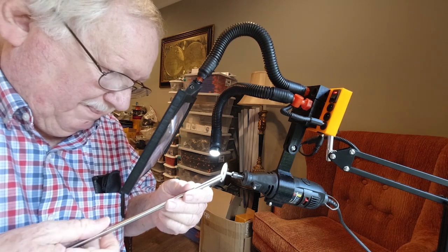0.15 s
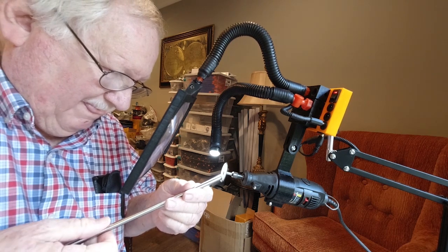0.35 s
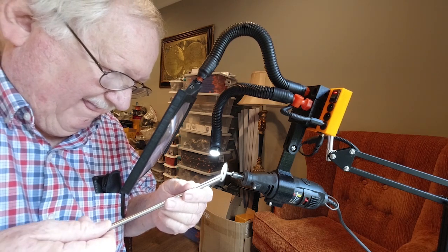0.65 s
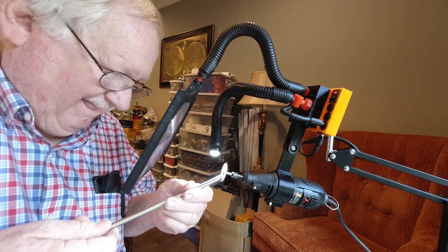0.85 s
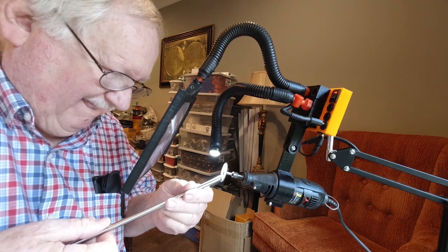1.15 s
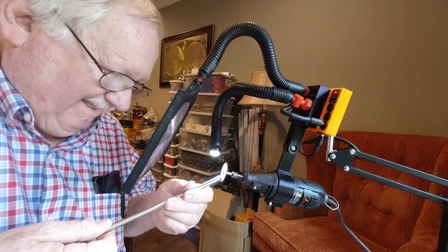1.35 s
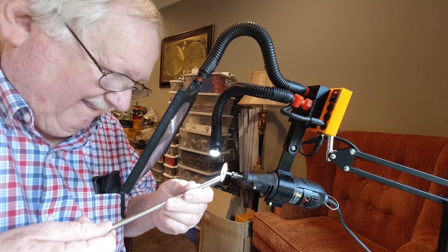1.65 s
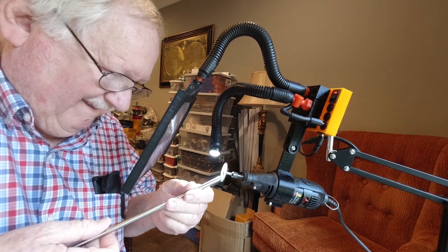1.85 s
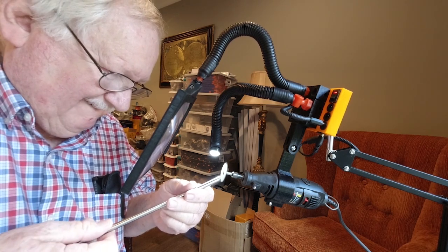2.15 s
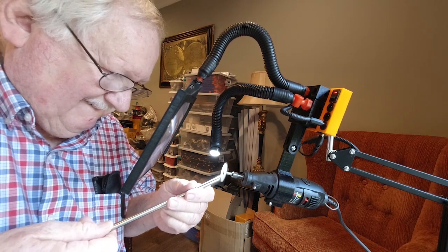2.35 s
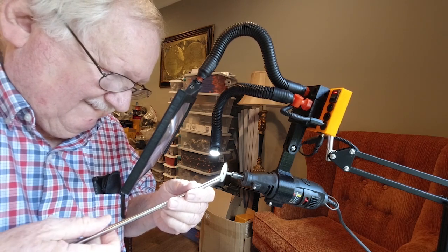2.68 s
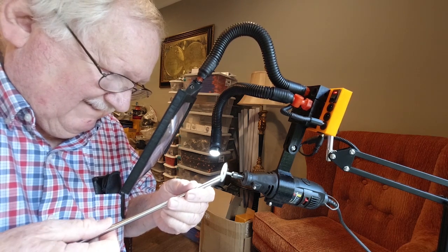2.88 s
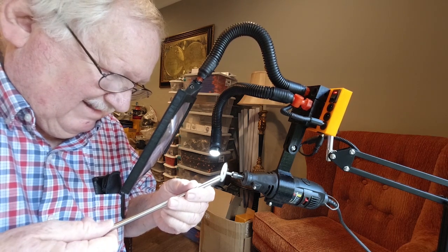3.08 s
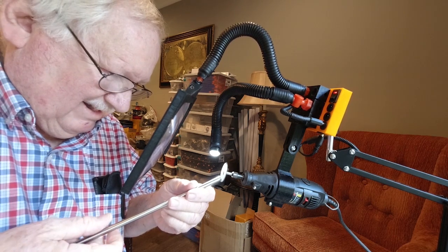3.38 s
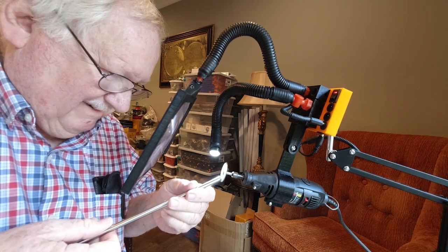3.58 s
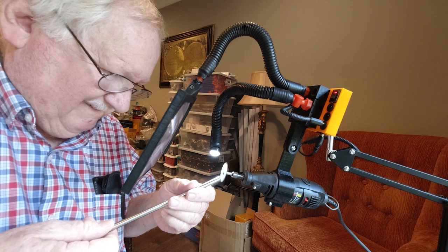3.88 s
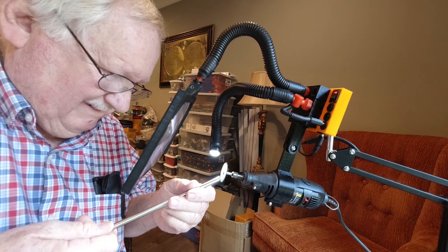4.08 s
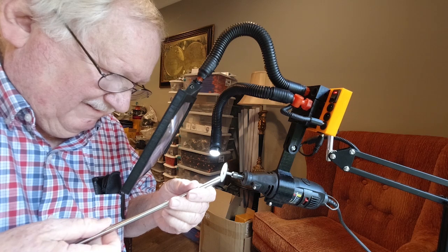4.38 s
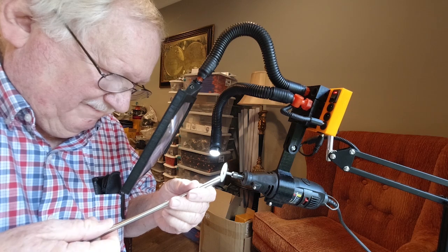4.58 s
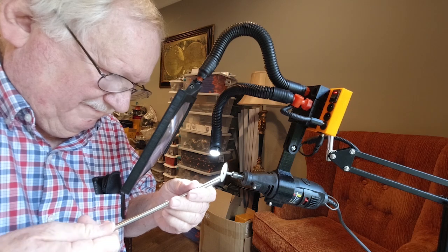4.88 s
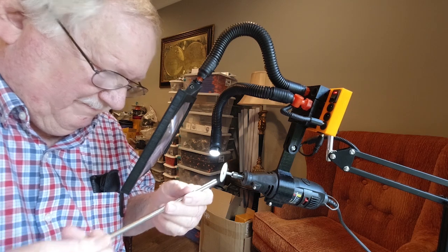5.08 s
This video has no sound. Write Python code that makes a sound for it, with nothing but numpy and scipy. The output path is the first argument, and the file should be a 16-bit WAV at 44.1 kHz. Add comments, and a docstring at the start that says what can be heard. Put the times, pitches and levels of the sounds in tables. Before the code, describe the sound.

High, raspy grinding is there from the start as a rotary tool's spinning wheel cuts a thin metal rod. Shrill squeals and ringing tones come and go over a fizzing hiss and a faint motor whine. The contact breaks briefly about two seconds in, resumes in uneven surges, then thins to light touches. The sound is close, in wide stereo, with the short echoes of a small room.

```python
"""A rotary tool's cut-off wheel, near 155 turns a second, grinds a thin metal rod pushed in by hand.
The same rim grit strikes the rod on every turn and slowly wears; this nearly periodic force drives the
modes of rod and wheel, which scrape, ring, screech and whistle. The motor sags under the load.
Between cuts only the mains-fed motor hums and whines, with the hiss of its cooling air.
A small furnished room adds short echoes, and the stereo image is widened."""
import sys
import numpy as np
from scipy import signal
from scipy.fft import rfft, irfft
from scipy.io import wavfile
from scipy.ndimage import uniform_filter1d, map_coordinates

SR = 44100
rng = np.random.default_rng(int(sys.argv[2]) if len(sys.argv) > 2 else 0)


def master(y):
    """Save y as 16-bit WAV."""
    cut = np.clip(np.atleast_2d(y).T, -1, 1)
    pcm = np.round(cut * 32767)  # scale
    wavfile.write(sys.argv[1], SR, pcm.astype(np.int16))


N = 230510
T = np.arange(N) / SR
FREQS = np.fft.rfftfreq(N, 1 / SR)
IDLE_HZ, MAINS_PULSE_HZ, TOP_HZ = 156.8, 120, 15750


def undb(db):
    """Decibels to amplitude ratio."""
    return 10 ** (np.asarray(db) / 20)


def unit(x):
    """Normalisation to rms 1."""
    return x / np.sqrt(np.mean(x ** 2))


def steady(x, seconds=0.11):
    """Normalisation of the short-term rms to 1, keeping the grain."""
    return x / np.sqrt(np.abs(uniform_filter1d(x ** 2, int(seconds * SR))) + 1e-12)


def walk(rate_hz):
    """Low-pass noise: a smooth random drift of rms 1."""
    hold = int(SR / rate_hz)
    steps = np.repeat(rng.standard_normal(N // hold + 1), hold)
    return unit(uniform_filter1d(uniform_filter1d(steps, hold), hold)[:N])


def swell(middle_s, length_s):
    """A rounded envelope that rises from 0 to 1, holds and falls."""
    return 1 / (1 + (2 * (T - middle_s) / length_s) ** 4)


def swells(events):
    """Superposed swells: one curve for each column after middle_s and length_s."""
    return np.transpose(events)[2:] @ np.array([swell(row[0], row[1]) for row in events])


def colour(x, points):
    """Zero-phase filtering by a curve of (frequency_hz, gain_db) points."""
    hz, db = np.transpose(points)
    return irfft(rfft(x) * undb(np.interp(np.log(FREQS + 1), np.log(hz), db)), N)


def resonate(spectrum, hz, width_hz):
    """Forced response of one damped mode, with steepened skirts."""
    f = FREQS + 1
    response = spectrum / (1 + 1j * (f * f - hz * hz) / (f * width_hz))
    return irfft(response / (1 + ((f - hz) / (5 * width_hz)) ** 2), N)


def ring(force, modes, shift_db):
    """Modal superposition: as the contact point creeps, each mode takes a changing share."""
    # a small part radiates little below its lowest mode
    spectrum = rfft(force) / np.sqrt(1 + (0.36 * modes[0][0] / (FREQS + 1)) ** 8)
    return steady(sum(undb(db + shift_db * walk(8)) * resonate(spectrum, hz, width_hz)
                      for hz, width_hz, db in modes))


def level(load, base_db, per_force, per_rasp, flutter_db):
    """Power-law gain in the hand's force and rasp, fluttering as the contact point shifts."""
    force_db, rasp_db = load
    return undb(base_db + per_force * force_db + per_rasp * rasp_db + flutter_db * walk(20.58))


def hand(release_db_per_s=343, tremor_hz=15, tremor_db=0.6, settled_chips_db=-11):
    """Contact loading: each press rises linearly, holds and decays exponentially."""
    # rod against wheel: touch_s, lift_s, attack_s, force_db, rasp_db, rod_db, screech_db, fizz_db
    contacts = [(0, 0.287, 0.001, -4, 6.5, -2, -3.5, -13), (0.343, 0.708, 0.18, -3, 4, 2, -1, -9),
                (0.725, 1.105, 0.068, -1.5, 3, 1, 2.5, -5), (1.096, 2.058, 0.1, -2, 0, 1, -0.5, 2),
                (2.188, 2.481, 0.018, -1.5, 0, 2, 1.5, 7),
                (2.522, 3.701, 0.024, -0.77, -0.3, -4.5, -2.5, 2),
                (3.703, 3.999, 0.21, 5, -0.2, -5.5, -2, 1), (4.211, 4.84, 0.028, -0.5, -1.9, -1.5, -1.5, 5),
                (4.903, 4.947, 0.04, -3, -4, -8, -3.5, 3), (5.021, 5.033, 0.014, -9, -6, -2, 3, 4),
                (5.052, 5.046, 0.0071, -11, -5, -7, -12, 5)]
    # the grinding briefly surges or dips:
    # middle_s, length_s, force_db, rasp_db, chips_db, shrill_db, fizz_db
    swings = [(0.162, 0.22, 2.5, 0, 29.5, 4, -5), (0.405, 0.044, 3, -1.5, 10, -18, -12),
              (0.53, 0.2, 1.5, 4, 10, 6.5, -6), (0.64, 0.073, -0.5, 0.5, 3.5, 5, -1),
              (0.74, 0.039, -3, 2, 14, -5, 0), (0.93, 0.16, -1, 2, 1, 4, -2),
              (1.016, 0.21, 4, 0.5, 15.5, 2, 10), (1.295, 0.08, 1, 5, 5, 6, -3),
              (1.37, 0.079, 1.5, 5, 9.5, -2, 0), (1.465, 0.09, 7, 2, 8.5, -8, -6),
              (1.565, 0.098, 3.5, 1.5, 10, 10, 1), (1.68, 0.04, 1.5, -1, 5, -5, 0),
              (1.78, 0.2, 3.5, 1.5, 5.5, 3, -4), (1.915, 0.14, 2.5, 2.5, 7.5, 6.5, -5),
              (2.055, 0.05, -2.5, 3, 11.5, 9, 2), (2.26, 0.062, -1.5, 0, 4, 0, 0),
              (2.33, 0.11, 2, 0, 7, 3, -1), (2.44, 0.1, 1, 0, 16, 4, -6), (2.62, 0.12, 4.5, 3, 10, 8, -1),
              (2.725, 0.12, 4, 2.5, 8.5, 1, 3), (3.04, 0.17, 5, -0.5, 11, -5, -9),
              (3.16, 0.08, 6, -0.5, 5.5, -16, -11), (3.475, 0.25, 7, 2, 10, 4, -3),
              (3.555, 0.031, -8, -2, 9, 7, 4), (3.68, 0.081, 2, -1, 11, -2, -1),
              (3.812, 0.012, -12, 3, 13, -5, 0), (3.955, 0.055, -4, -0.5, 13.5, 0, 0),
              (4.238, 0.028, 3, -2.5, 9.5, 3, -10), (4.35, 0.19, 6, 0.5, 15.5, -7, 2),
              (4.61, 0.28, 1.5, -0.5, 6, 0, -2), (4.735, 0.044, 0.5, 2, 7, -8, -3),
              (4.79, 0.055, -1, 1.5, 11, -13, -8)]
    presses = np.array([np.clip((T - touch) / attack, 0, 1)
                        * undb(db - release_db_per_s * np.maximum(T - lift, 0))
                        for touch, lift, attack, db, *_ in contacts]) + 1e-9
    total = presses.sum(axis=0)
    rasp_db, rod_db, screech_db, fizz_db = np.transpose(contacts)[4:] @ presses / total
    swing_db, swing_rasp_db, chips_db, shrill_db, swing_fizz_db = swells(swings)
    force_db = 20 * np.log10(total) + swing_db + tremor_db * walk(tremor_hz)
    return (force_db, rasp_db + swing_rasp_db, settled_chips_db + chips_db,
            rod_db, screech_db, shrill_db, fizz_db + swing_fizz_db)


def rim(turns, wear_turns, size=280, evenness=0.51):
    """Quasi-periodic excitation: a random rim profile returns each turn and is renewed by wear."""
    kept = np.exp(-1 / wear_turns)
    fresh = rng.standard_normal((N // 200, size))
    initial = kept * rng.standard_normal((1, size))
    worn, _ = signal.lfilter([np.sqrt(1 - kept ** 2)], [1, -kept], fresh, axis=0, zi=initial)
    harmonics = rfft(worn)
    evened = irfft(harmonics / (abs(harmonics) ** 2 + size / 10) ** (evenness / 2), size)
    return unit(map_coordinates(evened.ravel(), [turns * size], order=3, mode="nearest"))


def grit(turns, chips_db, pinch_db, chatter_per_db=0.28, lobes_db=1.5, wobble_db=1.5):
    """Abrasion: repeating grains and random chips give a force, modulated by the wheel's high spots."""
    # the warped wheel rubs each wall of the groove once a turn, and chatters when pinched
    wobble = (walk(5.14) + chatter_per_db * pinch_db) * np.cos(4 * np.pi * turns)
    ripple = undb(lobes_db * rim(turns, wear_turns=73, size=30) + wobble_db * wobble)
    grains = rim(turns, wear_turns=45)
    chips = undb(chips_db) * rng.standard_normal(N)
    force = steady(ripple * (grains + chips))
    # the light chips shake the rod less
    rod_force = steady(ripple * (rim(turns, wear_turns=25.8, evenness=1) + 0.5 * chips))
    return force, rod_force, ripple


def scraping(force, load, stall_db, shift_db=5.0, bands=18):
    """Modal overlap: dense modes of rod and wheel swell in groups as the groove changes shape."""
    # scrape spectrum: frequency_hz, gain_db
    response = [(60, -77), (400, -17.5), (700, -25), (1400, -23), (2400, -5.5), (2750, -16), (3000, -8.5),
                (3300, -10), (4100, -7.5), (4800, -8), (5300, -6.5), (6300, -8), (7200, -12), (8200, 0.5),
                (9200, 4), (13000, -13), (15600, -3)]
    spectrum, step_hz = rfft(colour(force, response)), TOP_HZ / bands
    groups = (irfft(spectrum * np.maximum(1 - abs(FREQS / step_hz - k), 0), N) for k in range(bands + 2))
    scrape = steady(sum(group * undb(shift_db * walk(7.4)) for group in groups))
    return scrape * level(load, -36.5 + stall_db, per_force=0.97, per_rasp=1, flutter_db=1.5)


def fizzing(force, load, fizz_db):
    """High-band noise: fine dust fizzes at the top of the contact force's spectrum."""
    # dust spectrum: frequency_hz, gain_db
    response = [(1000, -74), (9000, -28), (13000, 0), (13500, 4), (14200, 0), (15400, -2.5)]
    fizz = steady(colour(force, response))
    return fizz * level(load, -42 + fizz_db, per_force=0.59, per_rasp=0.078, flutter_db=2.2)


def rod_bending(force, load, rod_db):
    """Flexural vibration: the rod's bending modes ring out when the grip eases."""
    # bending modes: pitch_hz, width_hz, level_db
    modes = [(1290, 130, -15.5), (1535, 100, -7.5), (1874, 47, 3), (1963, 21, 12), (2400, 210, -1),
             (2514, 200, 1.5)]
    # the grip eases: middle_s, length_s, lift_db
    easings = [(.15, 0.023, 4), (.28, 0.076, 7), (.44, 0.33, 7), (.53, 0.06, -0.5), (.65, 0.1, 5.5),
               (.9, 0.1, 9), (.99, 0.036, 7.5), (1.11, 0.066, 7), (1.38, 0.12, 4.5), (1.605, 0.034, 3),
               (1.8, 0.07, 3), (2.06, 0.036, 4), (2.22, 0.03, -4), (2.38, 0.045, -1), (2.635, 0.1, 9.5),
               (2.74, 0.028, 8), (2.87, 0.038, 8.5), (3.07, 0.025, 12), (3.15, 0.046, 1), (3.4, 0.14, 8),
               (3.79, 0.1, 8.5), (3.99, 0.04, 6.5), (4.25, 0.056, 5), (4.4, 0.077, 6.5), (4.6, 0.082, 0.5),
               (4.76, 0.11, 0)]
    lift_db, = swells(easings)
    bending = ring(force, modes, shift_db=3.5)
    return bending * level(load, -45 + rod_db + lift_db, per_force=0.052, per_rasp=0.054, flutter_db=1.34)


def rod_screeching(force, load, screech_db, shift_db=2.5, reach_hz=415):
    """Resonance of the rod's upper modes: each screech lifts those near its own pitch."""
    # upper modes: pitch_hz, width_hz, level_db
    modes = [(3290, 210, -4.5), (3689, 165, -1.5), (4090, 99, -10.5), (4455, 97, -19), (4710, 76, -7),
             (4990, 260, -16), (6530, 1060, -6)]
    # the rod screeches in the groove: middle_s, length_s, lift_db, pitch_hz
    screeches = [(0.035, 0.15, 19.5, 4880), (0.19, 0.13, 23, 5040), (0.227, 0.18, 14, 6350),
                 (0.521, 0.054, 16.5, 4700), (0.586, 0.26, 10.5, 6500), (0.687, 0.068, 7, 4760),
                 (0.912, 0.13, 11.5, 4920), (0.977, 0.31, 4, 6400), (1.086, 0.052, 15, 5200),
                 (1.286, 0.06, 16, 4140), (1.354, 0.069, 10.5, 4570), (1.432, 0.22, -11, 4000),
                 (1.467, 0.04, 14, 5130), (1.568, 0.11, 16, 4270), (1.817, 0.16, 9, 4040),
                 (1.9, 0.2, -4, 6300), (1.93, 0.074, 9, 4200), (2.632, 0.13, 19, 4420),
                 (2.834, 0.17, 0.5, 3450), (3.086, 0.074, 16, 4500), (3.215, 0.1, 17, 4230),
                 (3.486, 0.17, 22, 4500), (4.35, 0.3, 12, 4230), (4.358, 0.19, 8, 6400),
                 (4.556, 0.29, 1, 4680), (4.656, 0.35, 4.5, 6260)]
    spectrum, out = rfft(force), 0
    lifts_db = np.array([db * swell(middle, length) for middle, length, db, _ in screeches])
    pitches_hz = np.transpose(screeches)[3]
    for hz, width_hz, db in modes:
        lift_db = np.exp(-((pitches_hz - hz) / reach_hz) ** 2) @ lifts_db
        out += undb(db + lift_db + shift_db * walk(10)) * steady(resonate(spectrum, hz, width_hz))
    return out * level(load, -44.5 + screech_db, per_force=0.29, per_rasp=0.14, flutter_db=2.33)


def wheel_ringing(force, load, low_db, squeal_db, shrill_db):
    """Forced vibration of a disc: the grit drives four groups of the wheel's modes."""
    # wheel modes, lowest group first: pitch_hz, width_hz, level_db
    low_modes = [(7110, 47, -4.5), (7530, 123, 2.5)]
    squeal_modes = [(10486, 150, -6), (10650, 75, -5), (10710, 88, 3.5), (11096, 110, -0.5)]
    sheen_modes = [(11520, 170, 2), (11920, 140, 10.5), (12380, 300, 4), (12760, 290, -9)]
    shrill_modes = [(12750, 97, 0), (13040, 170, -1)]
    low = ring(force, low_modes, shift_db=4.5)
    low *= level(load, -44 + low_db, per_force=0.61, per_rasp=0.85, flutter_db=2.5)
    squeal = ring(force, squeal_modes, shift_db=3.0)
    squeal *= level(load, -34.5 + squeal_db, per_force=0.49, per_rasp=0.35, flutter_db=1.7)
    sheen = ring(force, sheen_modes, shift_db=2.0)
    sheen *= level(load, -36.5, per_force=1, per_rasp=0.1, flutter_db=1.5)
    shrill = ring(force, shrill_modes, shift_db=7.0)
    shrill *= level(load, -40 + shrill_db, per_force=1, per_rasp=0.1, flutter_db=1.0)
    return low + squeal + sheen + shrill


def cutting(turns, force_db, rasp_db, chips_db, rod_db, screech_db, shrill_db, fizz_db):
    """Source and resonator: the grit excites rod and wheel for as long as they touch."""
    # the groove pinches the wheel and it sings out: middle_s, length_s, squeal_db, low_db
    pinches = [(0.814, 0.15, 2.5, -4), (1.05, 0.057, 2, 4), (1.405, 0.051, 6, 5), (1.47, 0.056, 7, 0),
               (1.632, 0.033, 13.5, 12), (1.83, 0.11, -0.5, 7.5), (2.26, 0.05, 10.5, 8),
               (2.75, 0.11, 6, 4.5), (2.88, 0.089, 11.5, 10), (3.66, 0.094, 5.5, 3),
               (3.995, 0.045, 9.5, 7.5), (4.32, 0.15, 5, 5.5), (4.46, 0.097, -3, 7), (4.665, 0.078, 7, 9.5),
               (4.95, 0.046, 3, -5), (5.06, 0.035, 8, -2)]
    squeal_db, low_db = swells(pinches)
    stall_db = -0.36 * squeal_db  # the cutting fades in a pinch
    load = force_db, rasp_db
    force, rod_force, ripple = grit(turns, chips_db, squeal_db)
    scrape = scraping(force, load, stall_db)
    fizz = fizzing(force * ripple, load, fizz_db)
    rod = rod_bending(rod_force, load, rod_db) + rod_screeching(rod_force, load, screech_db)
    wheel = wheel_ringing(force, load, low_db, squeal_db, shrill_db + stall_db)
    # as the force falls, the fingers damp the rod first
    wheel_on, rod_on = (1 / (1 + undb(touch_db - force_db) ** 2) for touch_db in (-19, -13))
    return scrape + wheel_on * (wheel + fizz) + rod_on * rod


def motor(turns, sag_hz, waver_db=2.0, whine_db_per_hz=-0.63):
    """Modulation: armature slots whine at shaft orders; the pulsing mains hums and adds sidebands."""
    # motor tones: shaft_order, added_mains_order, level_db
    tones = [(0, 1, -58), (0, 2, -53.5), (0, 4, -64.5), (0, 7, -66), (5, 0, -64), (8, -3, -62),
             (8, -1, -64.5), (8, 0, -61.5), (8, 2, -67), (8, 3, -70.5), (13, 0, -69), (16, -2, -52),
             (16, -1, -52.5), (16, 0, -62), (16, 1, -54.5), (16, 2, -56.5), (16, 3, -61.5), (18, 0, -52.5),
             (22, 0, -69), (23, 0, -72), (24, 0, -58), (32, 0, -60), (40, 0, -67)]
    out = 0
    for order, mains_order, db in tones:
        cycles = order * turns + mains_order * MAINS_PULSE_HZ * T + rng.random()
        drift_db = waver_db * walk(17) * (order > 0)
        load_db = whine_db_per_hz * sag_hz * (order > 10)  # the whine weakens as the shaft slows
        out += undb(db + drift_db + load_db) * np.sin(2 * np.pi * cycles)
    return np.sqrt(2) * out


def shaking(turns, sag_hz, rasp_db):
    """Rotating unbalance shakes tool and clamp at low shaft orders; the rod judders at a subharmonic."""
    # tool vibration: shaft_order, idle_db, db_per_sag_hz, db_per_rasp_db, waver_db
    orders = [(1, -58.5, 2, 0.17, 0.8), (2, -62, -1.55, 1.18, 1.5), (3, -76.5, 7, 1.07, 1)]
    # the rod catches on every second turn: middle_s, length_s, level_db
    judders = [(.19, 0.19, -57), (1.04, .12, -67)]
    out = sum(undb(db) * swell(middle, length) for middle, length, db in judders) * np.sin(np.pi * turns)
    for order, db, per_sag, per_rasp, waver_db in orders:
        gain = undb(db + per_sag * sag_hz + per_rasp * rasp_db + waver_db * walk(21.96))
        out += gain * np.sin(2 * np.pi * (order * turns + rng.random()))
    return np.sqrt(2) * out


def fan(turns, sag_hz, idle_db=-50, db_per_hz=1.35, repeat_db=-3):
    """Modulated noise: air and brush hiss partly repeats each turn, throbs with mains, rises with load."""
    # hiss spectrum: frequency_hz, gain_db
    response = [(25, -1), (70, -5), (300, -6), (630, -8.5), (780, -1), (1020, -4), (1250, 3.5),
                (1700, -6.5), (2400, 2), (3000, -0.5), (3700, 4.5), (4400, -8.5), (6000, -0.5),
                (8000, -19.5), (16000, -48)]
    hiss = rng.standard_normal(N) + undb(repeat_db) * rim(turns, wear_turns=56)
    throbbing = hiss * (1 + np.cos(2 * np.pi * MAINS_PULSE_HZ * T))
    return unit(colour(throbbing, response)) * undb(idle_db + db_per_hz * sag_hz)


def whistling(turns, waver_db=2.2, slip_cycles=0.06):
    """Mode locking: a rod mode holds to a multiple of the shaft speed, slipping a little in phase."""
    # locked tones: middle_s, length_s, shaft_order, level_db
    whistles = [(0.833, .07, 24, -39), (1.06, .14, 24, -50), (1.3, .07, 26, -40), (1.42, 0.24, 27, -46.5),
                (1.452, 0.142, 24, -39), (1.45, 0.031, 33, -32.5), (1.52, 0.3, 26, -42),
                (1.55, .5, 22, -49), (1.86, 0.27, 24, -41), (1.9, 0.22, 27, -49.5), (2.63, 0.12, 30, -41),
                (2.806, .2, 20, -50), (2.82, .22, 24, -44.5), (2.844, .17, 23, -42), (3.14, .2, 30, -56),
                (4.5, .22, 30, -51)]
    out = 0
    for middle, length, order, db in whistles:
        cycles = order * turns + slip_cycles * walk(90) + rng.random()
        out += undb(db + waver_db * walk(29.54)) * swell(middle, length) * np.sin(2 * np.pi * cycles)
    return np.sqrt(2) * out


def diffusion(decay_s):
    """Phase scattering: the nearly flat frequency response of a dense, decaying noise tail."""
    tail = rng.standard_normal(N) * undb(-60 * T / decay_s) * (T > .002)
    for _ in range(3):  # flatten the spectrum, then taper the tail again
        spectrum = rfft(tail)
        tail = irfft(spectrum / (abs(spectrum) + 1e-12), N) * undb(-20 * T / decay_s)
    return rfft(tail / np.sqrt(np.sum(tail ** 2)))


def room(x, decay_s=0.24, widening_s=0.016, wet_db=-11, side_db=-7.0, diffuse_db=-4.5):
    """Reverberation and stereo widening: short echoes, a frequency-dependent left-right phase shift."""
    # colour of the echoes and of the side signal: frequency_hz, gain_db
    echo_colour = [(150, -19), (700, -4), (1800, 1.5), (13000, 3.5), (15000, -6)]
    side_colour = [(30, -2), (150, -18.5), (700, -10), (1300, -3.5), (1900, 7.5), (2500, 1.5), (4100, 9.5),
                   (6200, 4), (7400, 3), (9000, 4.5), (10700, 6), (12000, 5), (13000, 11), (15000, -11)]
    direct = rfft(x)
    mid = x + undb(wet_db) * colour(irfft(direct * diffusion(decay_s), N), echo_colour)
    # a side signal in quadrature shifts the phase, with equal level on both sides
    quadrature = 1j * np.tanh(4 * diffusion(widening_s).real)
    late = undb(diffuse_db) * diffusion(decay_s)
    side = undb(side_db) * colour(irfft(direct * (quadrature + late), N), side_colour)
    return np.array([mid + side, mid - side])


def scene():
    """Synchronous sources: one shaft angle drives motor, wheel and grit; one hand presses the rod."""
    # shaft speed: time_s, speed_hz
    speed = [(0, 156.4), (.22, 154.5), (.42, 155.6), (.64, 154.5), (.88, 155.4), (1.06, 153.4),
             (1.28, 154.1), (1.53, 153.3), (1.78, 153.9), (1.98, 153.6), (2.28, 155.9), (2.56, 156.2),
             (2.78, 155.5), (3.36, 156.1), (3.58, 154.7), (4.05, 155.7), (4.23, 156.8), (4.44, 155.2),
             (4.88, 154.7), (5.23, 156.3)]
    shaft_hz = np.interp(T, *np.transpose(speed))
    turns = np.cumsum(shaft_hz + 0.0925 * walk(25.11) + 0.15 * walk(150)) / SR
    sag_hz = IDLE_HZ - shaft_hz
    force_db, rasp_db, *timbre_db = hand()
    tool = motor(turns, sag_hz) + shaking(turns, sag_hz, rasp_db) + fan(turns, sag_hz)
    return room(cutting(turns, force_db, rasp_db, *timbre_db) + whistling(turns) + tool)


def record(dry):
    """Band limiting: a steep elliptic low-pass removes the highest treble."""
    return signal.sosfilt(signal.ellip(10, .2, 80, TOP_HZ, fs=SR, output="sos"), dry)


dry = scene()
out = record(dry)
master(out)
```